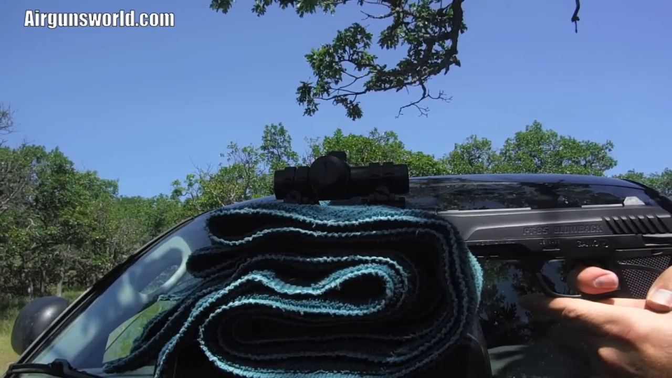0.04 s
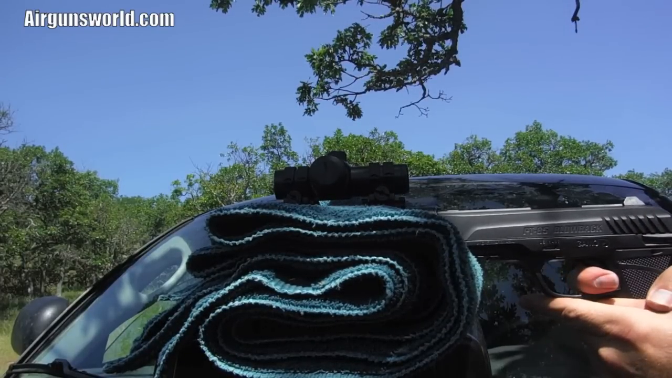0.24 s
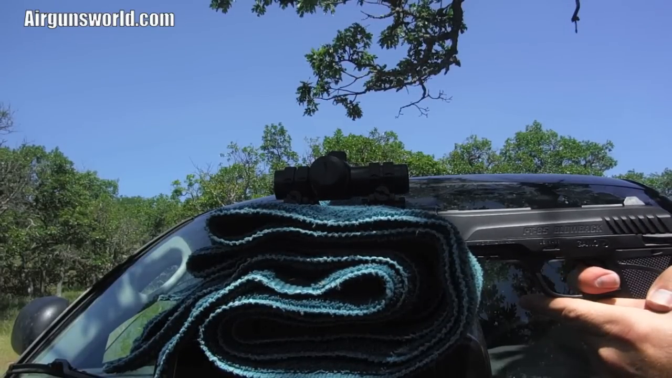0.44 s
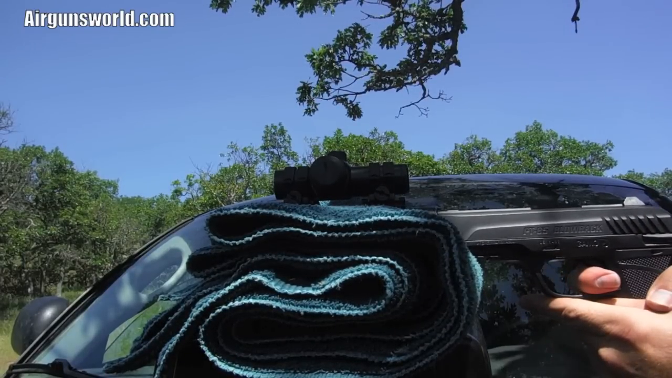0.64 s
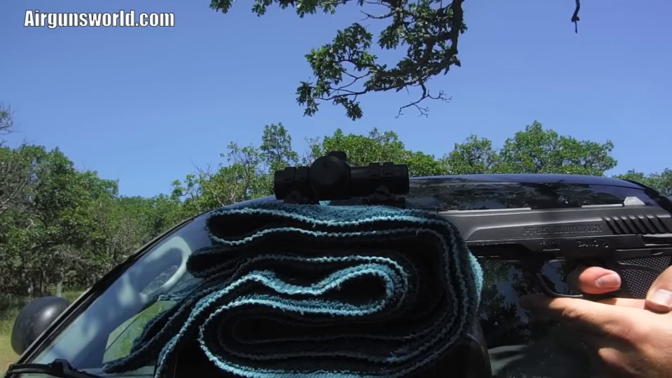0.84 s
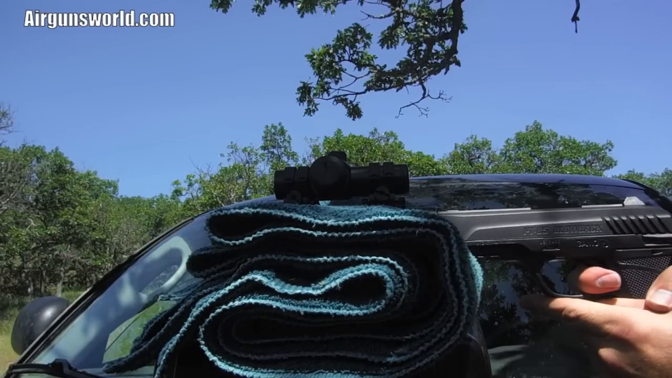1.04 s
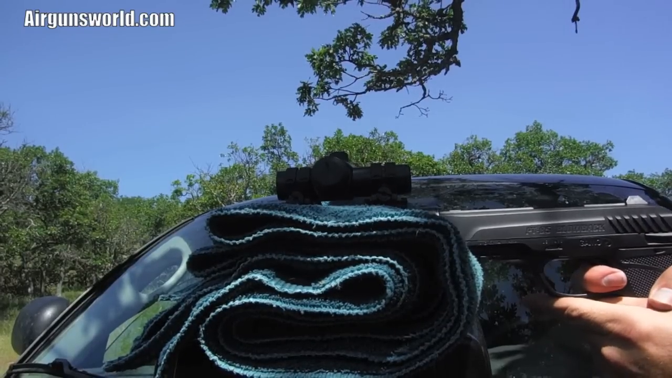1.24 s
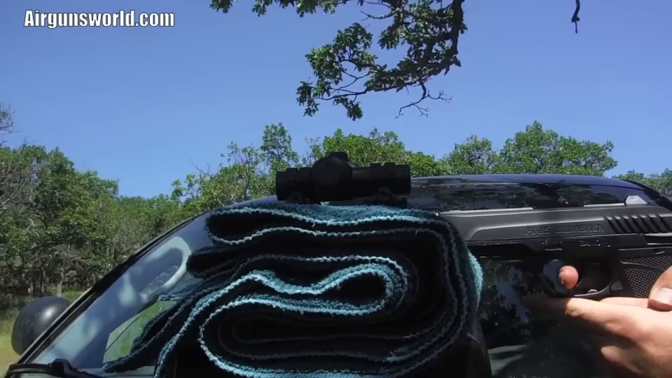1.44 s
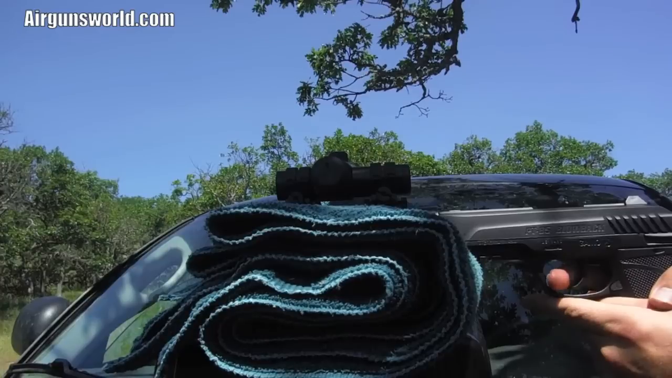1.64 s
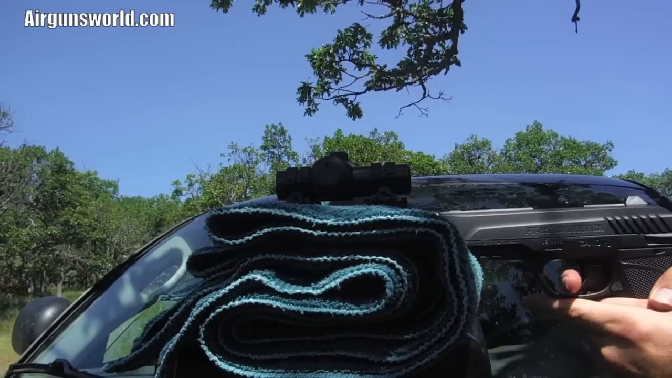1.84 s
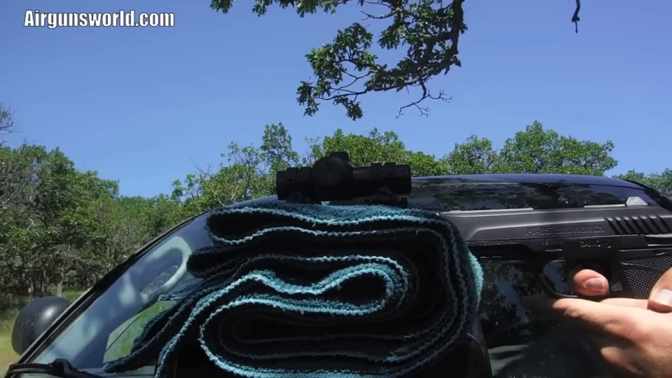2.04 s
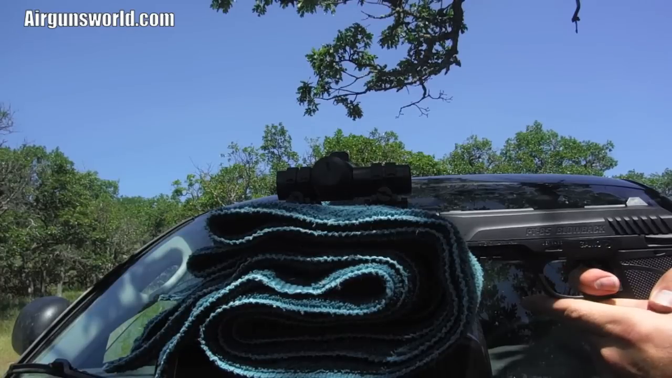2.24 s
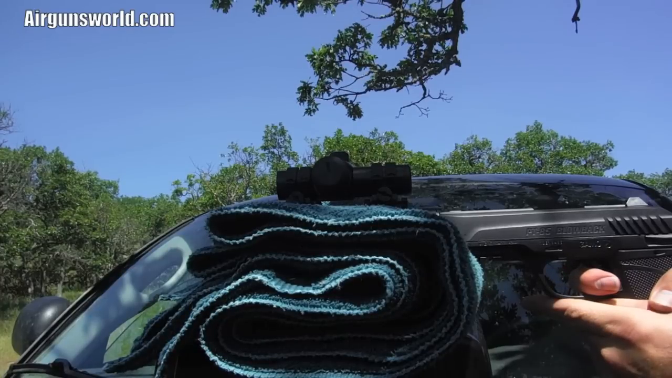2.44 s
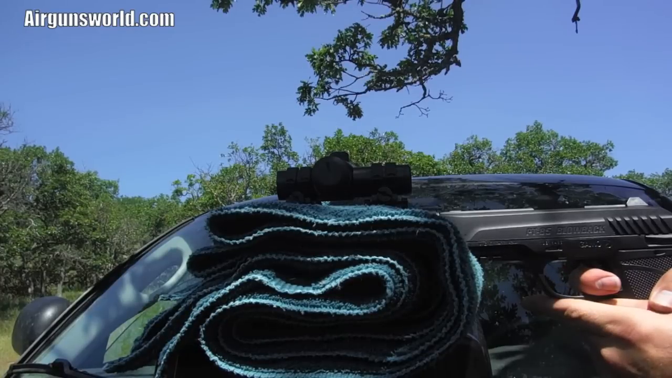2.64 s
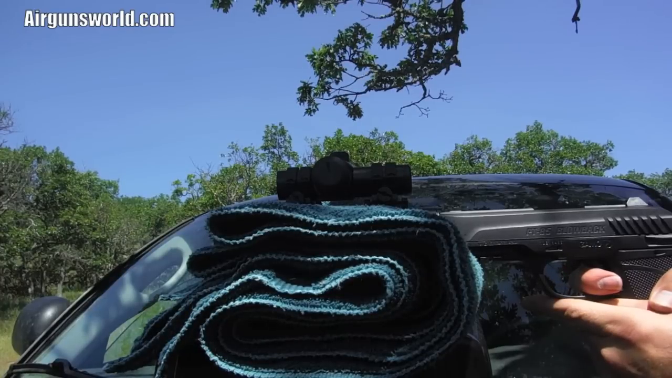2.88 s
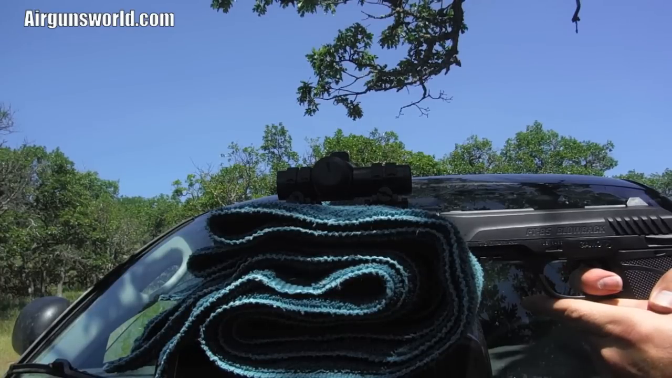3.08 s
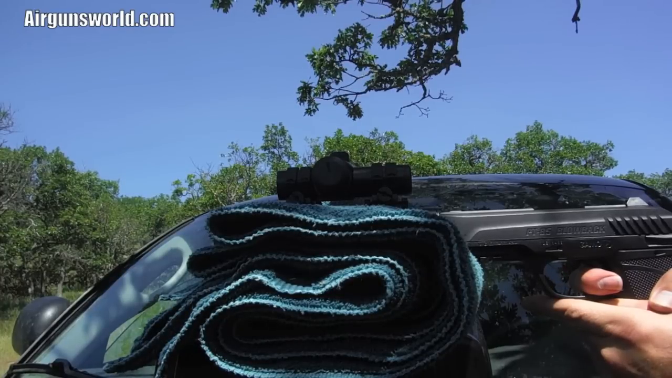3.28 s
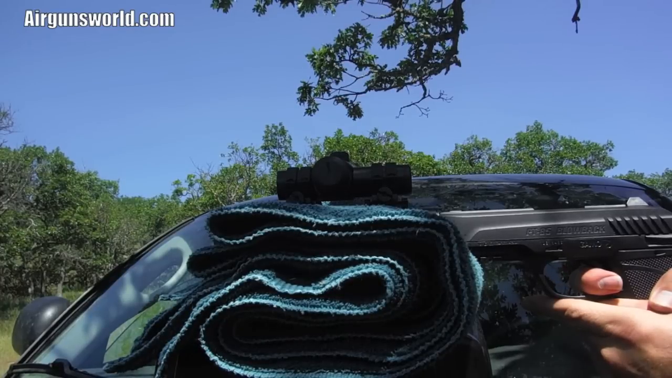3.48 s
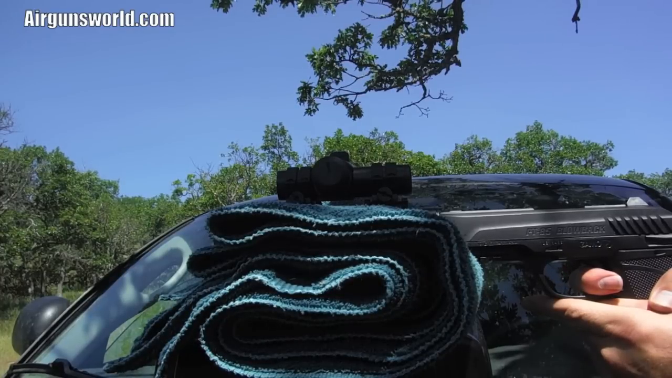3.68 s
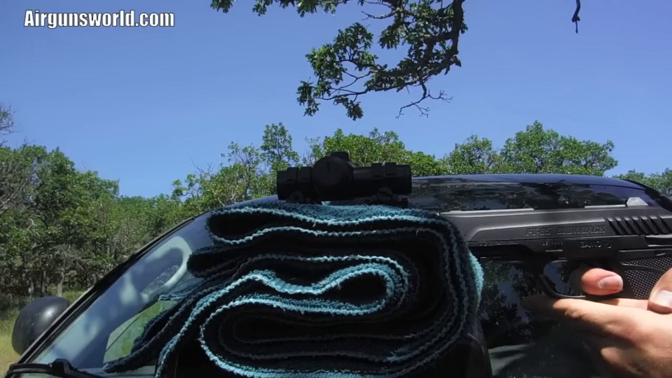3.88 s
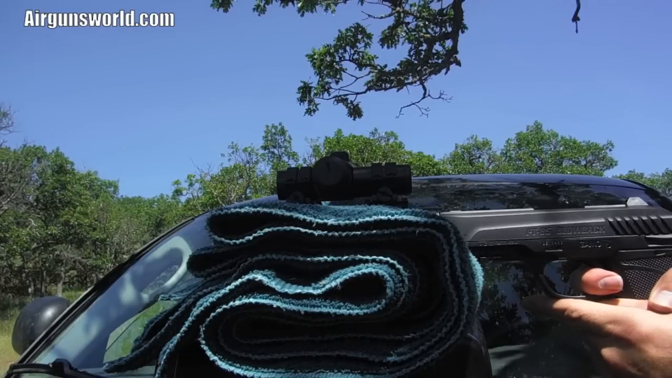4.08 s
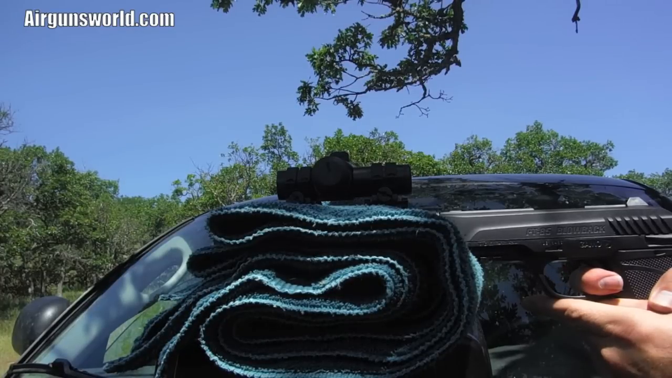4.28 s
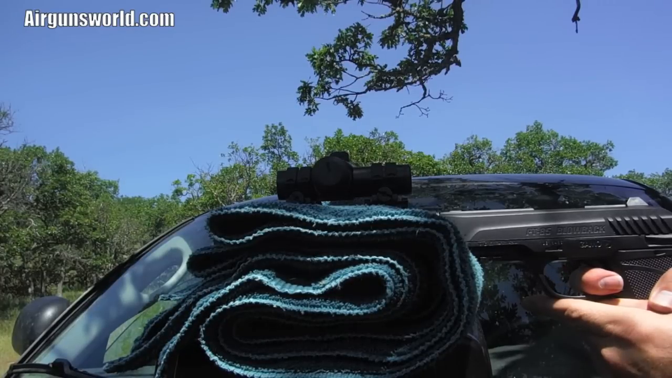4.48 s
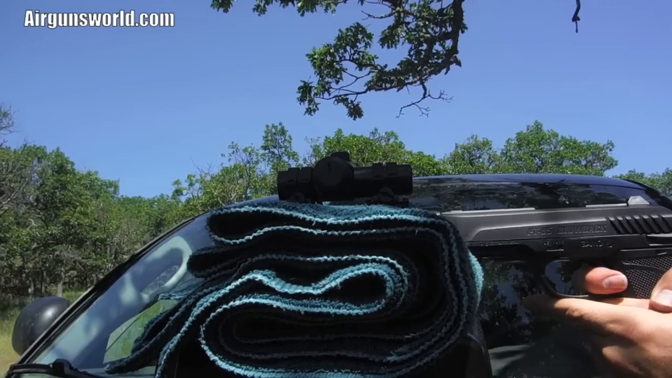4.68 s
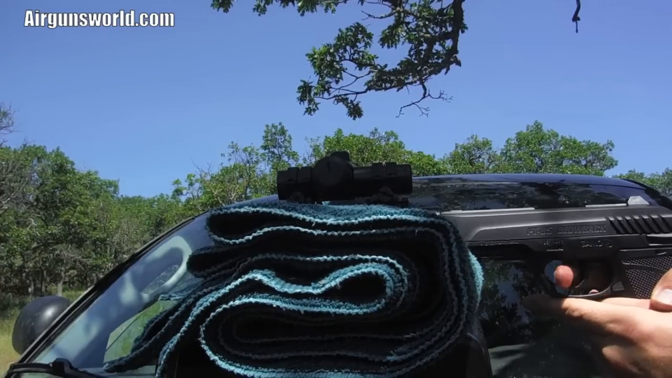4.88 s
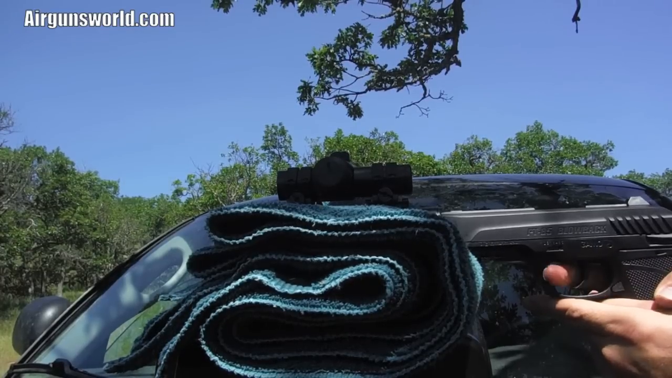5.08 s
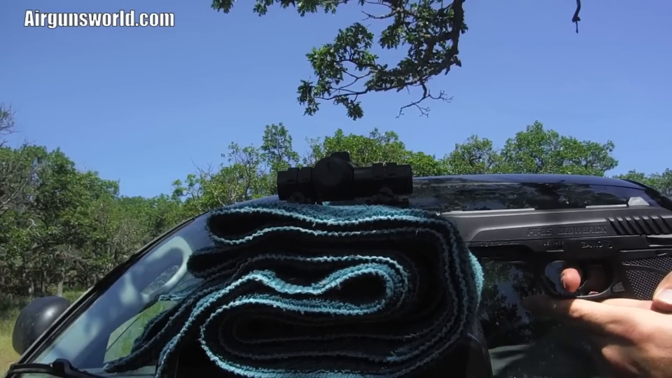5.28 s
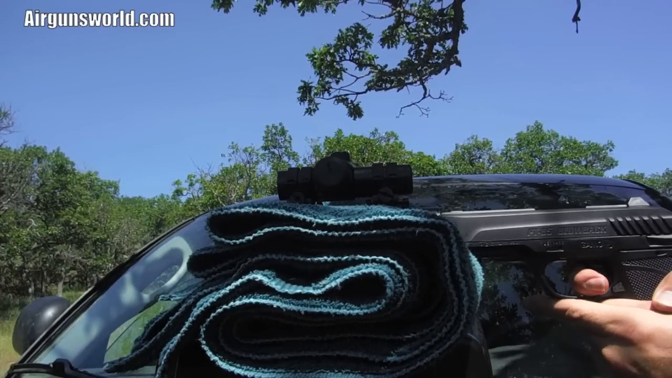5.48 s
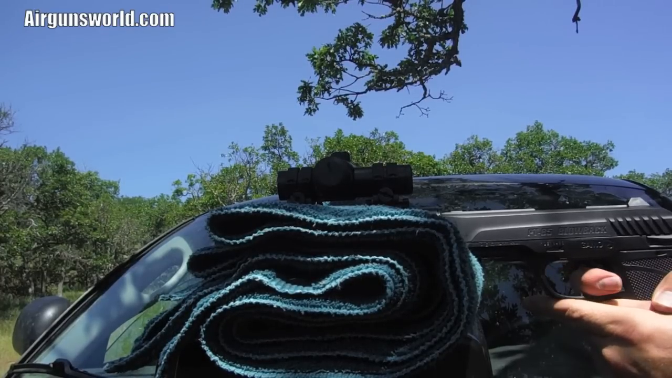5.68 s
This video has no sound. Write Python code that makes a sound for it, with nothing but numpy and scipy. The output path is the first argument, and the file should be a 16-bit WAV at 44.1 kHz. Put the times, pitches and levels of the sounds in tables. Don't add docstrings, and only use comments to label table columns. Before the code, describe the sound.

A gas pistol resting on a folded blanket on a car fires twice. Each shot starts with a tiny scrape, then a harsh distorted burst of gas with hammer clatter and a low thump. A dry target smack, light rattling and a short woodland echo follow. The background dips after each blast and returns; a small trigger click comes later. Close, cheap camera microphone.

```python
import sys
import numpy as np
from scipy import signal
from scipy.fft import rfft, irfft
from scipy.io import wavfile
from scipy.ndimage import uniform_filter1d

SR = 44100
rng = np.random.default_rng(int(sys.argv[2]) if len(sys.argv) > 2 else 0)


def wav_record(signal):
    frames = np.transpose(np.atleast_2d(signal))
    bounded = np.clip(frames, -1, 1)
    quanta = np.round(bounded * 32767).astype(np.int16)
    wavfile.write(sys.argv[1], SR, quanta)


def volts(x):
    e = np.asarray(x, float) / 20
    return 10 ** e


N = 252322


def noise(count):
    return rng.standard_normal(count)


def unit(x):
    return x / np.sqrt(np.mean(x ** 2))


def fade(t60, count):
    return np.exp(-np.log(1000) * np.arange(count) / SR / max(t60, 1e-4))


def colour(x, points, tilt=0):
    hz = np.maximum(np.fft.rfftfreq(8192, 1 / SR), 10)
    point_hz, point_db = np.array(points).T
    db = np.interp(np.log(hz), np.log(point_hz), point_db) + tilt * np.log2(hz / 4000)
    cepstrum = irfft(np.log(volts(np.maximum(db, -90))))
    cepstrum[1:4096] *= 2
    cepstrum[4097:] = 0
    impulse = irfft(np.exp(rfft(cepstrum)))
    return signal.fftconvolve(x, impulse)[:len(x)]


def band(hz, width, count):
    b, a = signal.iirpeak(min(hz, .45 * SR), hz / width, SR)
    return unit(signal.lfilter(b, a, noise(count)))


def walk(rate):
    k = int(SR / rate)
    steps = np.repeat(noise(N // k + 1), k)
    return unit(uniform_filter1d(uniform_filter1d(steps, k), k)[:N])


def add(out, s, x):
    i = int(round(s * SR))
    out[i:i + len(x)] += x[:N - i]


# hz [Hz], level_db [dB per Hz]
AIR_COLOUR = [(12, -33), (20, 3.5), (190, -2), (612, -10.5), (955, -16.5), (4050, -23.5), (13500, -25),
              (15400, -22.5)]
# pitch_hz [Hz], width_hz [Hz], level_db [dB], gated_share [0-1]
WHINE_BANDS = [(7820, 40, -75.5, 0.6), (8025, 70, -78, .3), (9690, 160, -69, 0.7), (9700, 990, -70.5, .05)]


def air():
    frame_rate_hz, scan_hz, beat_hz = 59.94, 15735, 13.05
    t = np.arange(N) / SR
    bed = unit(colour(noise(N), AIR_COLOUR)) * volts(-50.5)
    rumble = signal.sosfilt(signal.butter(2, 400, fs=SR, output="sos"), bed)
    waver = volts(0.52 * walk(2.7) + 0.29 * walk(21))
    bed = bed + rumble * (waver - 1)
    gate = np.where((frame_rate_hz * t - .46) % 1 < .5, 1., -1.)
    whine = sum(volts(db) * band(hz, width, N) * (1 + share * gate) for hz, width, db, share in WHINE_BANDS)
    beat = 1 + .55 * np.cos(2 * np.pi * beat_hz * (t - 3.05))
    scan = volts(-65.5) * np.sin(2 * np.pi * scan_hz * t) * beat
    return bed + whine + scan


# hz [Hz], level_db [dB per Hz]
CRACK_COLOUR = [(500, -40), (950, -20), (1450, -3), (2500, 0), (5000, 0), (10000, -4), (13500, -10),
                (16000, -22)]


def knocks(events, modes, spread_db, chatter, smear_tilt, count=6000):
    longest_ring_s, chatter_t60_s, chatter_left = .105, 0.04, 0.26
    out, t = np.zeros(N), np.arange(count) / SR
    smear = unit(colour(noise(count), CRACK_COLOUR, smear_tilt) * fade(.085, count)) / np.sqrt(count)
    chatter_fall = chatter_left + fade(chatter_t60_s, count)
    for s, db, contact_s, tilt, crack_db, share in events:
        push = fade(3 * abs(contact_s), count) * (1 - fade(0.19 * abs(contact_s), count))
        ring = 0
        for hz, mode_db, t60 in modes:
            level_luck, pitch_luck, phase = noise(3)
            swing = signal.fftconvolve(push[:900], fade(share * min(t60, longest_ring_s), count))[:count]
            tone = np.sin(2 * np.pi * hz * (1 + .002 * pitch_luck) * t + 9 * phase)
            rough = tone + chatter * band(hz, 340, count) * chatter_fall
            level = volts(mode_db + tilt * np.log2(hz / 4000) + spread_db * level_luck)
            ring = ring + level * swing / swing.max() * rough
        crack = colour(push * noise(count), CRACK_COLOUR, tilt)
        ring = ring / np.abs(ring).max()
        crack = volts(crack_db) * crack / np.abs(crack).max()
        off_car = signal.fftconvolve(0.11 * ring + 3.1 * crack, smear)[:count]
        add(out, s, volts(db) * (ring + crack + volts(-23) * off_car))
    return out


def taps(rows, crack_db, share):
    return [(s, db, contact_s, tilt, crack_db, share) for s, db, tilt, contact_s in rows]


# lead_s [s], level_db [dB], tilt_db [dB per octave], contact_s [s]
SEAR_SLIPS = [
    (.0075, -31.5, -7.5, .006),
    (.005, -26, .6, .004),
]
# pitch_hz [Hz], level_db [dB], t60_s [s]
LEVER_MODES = [(1500, -12, .09), (1850, -4, .018), (2400, -5, .014), (3070, 2, .035), (3620, -6, .016),
               (5080, 2, .018), (4900, -17, .12), (7300, -4, .014), (8650, -8, .012), (10100, -8, .01),
               (11700, -14, .01)]


def sear():
    rows = [(shot[0] - lead_s, *rest) for shot in SHOT_BLASTS for lead_s, *rest in SEAR_SLIPS]
    return knocks(taps(rows, 1.5, .3), LEVER_MODES, 2.1, 0.3, -5)


# start_s [s], level_db [dB before overload], gas_t60_s [s], thump_db [dB], echo_db [dB]
SHOT_BLASTS = [
    (1.2024, 16, 0.055, 7, -33.5),
    (4.614, 12, .085, 2, -36),
]
# hz [Hz], level_db [dB per Hz]
GAS_COLOUR = [(35, -30), (60, -11.5), (315, -0.5), (1050, -9.5), (1620, -0.5), (2400, -9.5), (4200, -3),
              (16000, -11.5)]
# pitch_hz [Hz], width_hz [Hz], level_db [dB], t60_s [s]
REST_MODES = [(79.66, 34, -13, 0.13), (120.4, 110, -17, 0.065), (216, 50, -3, 0.061), (314, 65, -10, 0.072),
              (397, 15, -3.5, .07), (575, 48, -15, 0.018)]


def shots(count=40000):
    out, t = np.zeros(N), np.arange(count) / SR
    for s, db, gas_t60, thump_db, echo_db in SHOT_BLASTS:
        roar = unit(colour(noise(count), GAS_COLOUR)) * fade(gas_t60, count) * (1 - fade(.012, count))
        barrel = -volts(4) * np.sin(2 * np.pi * 1590 * t) * fade(.01, count)
        thump = 0
        for hz, width, mode_db, t60 in REST_MODES:
            rough = np.sin(2 * np.pi * hz * t) + .6 * band(hz, width, count)
            thump = thump + volts(mode_db) * rough * fade(t60, count)
        thump = volts(thump_db) * thump * (1 - fade(0.0023, count))
        boom = volts(-35) * band(45, 70, count) * fade(1.0, count) * (1 - fade(.1, count))
        add(out, s, volts(db) * (roar + barrel) + thump + boom)
        add(out, s, volts(echo_db) * echo(.05))
    return out


# start_s [s], level_db [dB], tilt_db [dB per octave], frame_freedom [0-1 in the grip]
HAMMER_REBOUNDS = [(1.2255, 9, -5.5, 0.5), (1.2329, 14.5, 1.55, .65), (1.2562, -17, 0.1, .8),
                   (1.2718, -2.5, -3.5, .8), (4.6212, 11.5, 5, .7), (4.626, 8, -7.5, .95),
                   (4.646, 14, 1.47, .85), (4.6818, -4, -2.5, 0.9)]
# pitch_hz [Hz], level_db [dB], t60_s [s]
FRAME_MODES = [(1579, -2.5, 0.091), (2310, -15, 0.12), (3058, -6.5, 0.038), (3670, -9, 0.07),
               (4313, -13, 0.08), (4964, -3, 0.063), (6870, -14, 0.12), (7310, -17.5, 0.18),
               (7490, -9, 0.1), (8076, -0.5, 0.058), (9230, -15.5, 0.066), (9960, -6.5, 0.14),
               (10130, -24, 0.054), (10900, -13, 0.044)]


def hammer():
    blows = [(shot[0], 16.5, 0.09, .7, 2.5) for shot in SHOT_BLASTS]
    for s, db, tilt, free in HAMMER_REBOUNDS:
        blows.append((s, db, tilt, free, -3.5 if db > 0 else -0.74))
    events = []
    for s, db, tilt, free, crack_db in blows:
        contact_s = .0023 * volts(0.99 * db)
        ring_share = free * .3 * volts(.6 * db)
        events.append((s, db, contact_s, tilt, crack_db, ring_share))
    return knocks(events, FRAME_MODES, 1.1, 1.1, -.4)


# centre_hz [Hz], level_db [dB], t60_s [s]
TREE_BANDS = [(350, -15, 0.19), (700, -8.5, 0.42), (1300, -2, 0.96), (2580, -2, 0.8), (4100, -3, 0.98),
              (7500, -9, 0.28), (12000, -16, .2)]


def echo(rise_s, count=40000):
    swell = (1 - fade(rise_s, count)) * volts(2.5 * walk(70)[:count])
    tail = 0
    for hz, db, t60 in TREE_BANDS:
        octave = signal.butter(2, [.68 * hz, 1.33 * hz], "band", fs=SR, output="sos")
        tail = tail + volts(db) * unit(signal.sosfilt(octave, noise(count))) * fade(t60, count)
    return swell * tail


# start_s [s], level_db [dB], ground_lag_s [s], ground_db [dB], splinter_db [dB]
PELLET_HITS = [
    (1.3101, 1.5, .00095, -3, -7),
    (4.7221, 0.5, .00095, -11, -8.5),
]


def pellet(count=12000):
    smack_hz, smack_s, scatter_t60_s = 3900, .00014, .2
    out, t = np.zeros(N), np.arange(count) / SR
    smack = np.sin(2 * np.pi * smack_hz * t) * np.exp(-((t - smack_s) / smack_s) ** 2)
    for s, db, lag_s, ground_db, splinter_db in PELLET_HITS:
        splinter = unit(colour(noise(count), CRACK_COLOUR, -2.5))
        scatter = unit(colour(noise(count), CRACK_COLOUR, -3.5))
        add(out, s, volts(db) * smack)
        add(out, s + lag_s, volts(db + ground_db) * smack)
        add(out, s + 0.000067, volts(db + splinter_db) * splinter * fade(.009, count))
        dull = uniform_filter1d(scatter, size=4)
        bright = scatter - dull
        scatter = dull * fade(scatter_t60_s, count) + bright * fade(0.6 * scatter_t60_s, count)
        add(out, s + .001, volts(-26.5 + 2.5 * walk(117)[:count]) * scatter)
    return out


# start_s [s], level_db [dB], tilt_db [dB per octave], contact_s [s]
RATTLE_TAPS = [(1.3263, -19, -4, .0023), (1.3734, -18.5, -2.5, .0016), (1.3766, -30, -4, 0.002),
               (1.4103, -15, 1.5, .0025), (1.4126, -18.5, -0.5, 0.00083), (1.426, -22.5, 4.5, 0.004),
               (1.5065, -29, -2, 0.0034), (4.7383, -34, 6, 0.0017), (4.7985, -21, -2.2, 0.0035),
               (4.8386, -14, 1.1, 0.0034), (4.8492, -22, 5, 0.0039), (4.9144, -29.5, -3, 0.0021),
               (5.0088, -41.5, -2, 0.0011), (5.0638, -47, -9, 0.0037)]
# pitch_hz [Hz], level_db [dB], t60_s [s]
LOOSE_MODES = [(1770, 6, 0.0079), (3370, -2, 0.011), (4900, 0.5, 0.011), (7370, -3, 0.035), (8596, 3, .016),
               (10400, -7, 0.0087)]


def rattle():
    return knocks(taps(RATTLE_TAPS, -.6, .5), LOOSE_MODES, 1.5, 0.85, -7.6)


# start_s [s], level_db [dB], tilt_db [dB per octave], contact_s [s]
TRIGGER_TAPS = [(2.1402, -27, -1, 0.00052), (2.1664, -29.5, -5, .001), (2.1712, -33, 5, .003),
                (2.1735, -13.5, .6, .0026), (5.6099, -25.5, 2, .0014), (5.6452, -38, 5, 0.0053),
                (5.6477, -28.5, -8.5, 0.0017), (5.6493, -16.5, 2.5, .0013)]


def trigger():
    return knocks(taps(TRIGGER_TAPS, -8, .4), LEVER_MODES, 2.1, 0.3, -5)


def scene():
    gun = sear() + shots() + hammer() + rattle() + trigger()
    return (air() + gun + pellet())[None]


def band_limit(x):
    return signal.sosfilt(signal.butter(12, 16400, fs=SR, output="sos"), x)


def record(dry):
    duck_db, duck_above, attack_s, hold_s, ramp_s = -5.5, .4, 0.0027, 0.2, 0.27
    ceiling = .7
    t = np.arange(N) / SR
    last_loud = np.maximum.accumulate(np.where(np.abs(dry) > duck_above, t, -9), axis=-1)
    target = np.clip(1 - (t - last_loud - hold_s) / ramp_s, 0, 1)
    pole = np.exp(-1 / (attack_s * SR))
    duck = signal.lfilter([1 - pole], [1, -pole], target)
    x = dry * volts(duck_db * duck)
    x = x / (1 + np.abs(x / ceiling) ** 8) ** (1 / 8)
    x = signal.sosfilt(signal.butter(1, 18, "high", fs=SR, output="sos"), x)
    recover = -np.gradient(duck, axis=-1) * SR * ramp_s
    x = x + volts(-49) * uniform_filter1d(np.clip(recover, 0, 1), size=1500)
    x = signal.sosfiltfilt(signal.ellip(7, .1, 16, 15800, fs=SR, output="sos"), x)
    return band_limit(np.clip(x, -1, 1))


dry = scene()
out = record(dry)
wav_record(out)
```